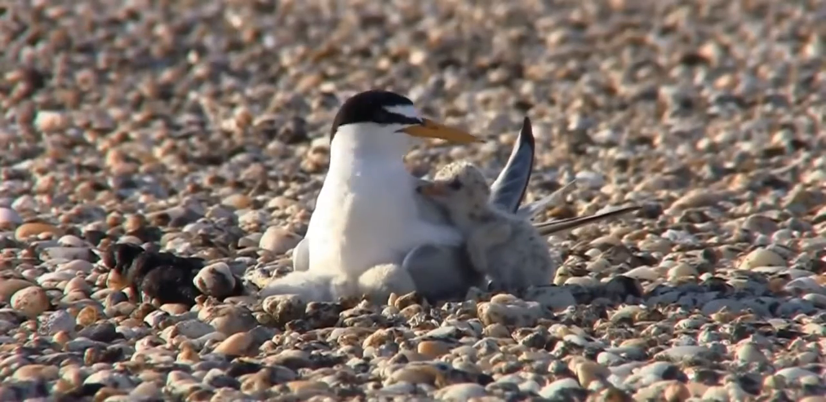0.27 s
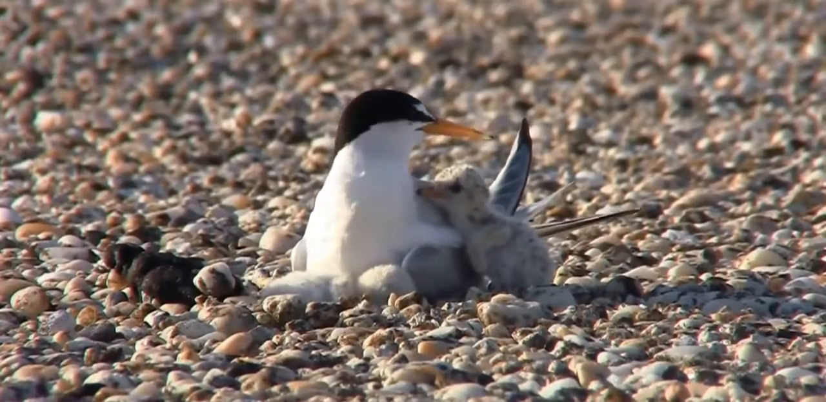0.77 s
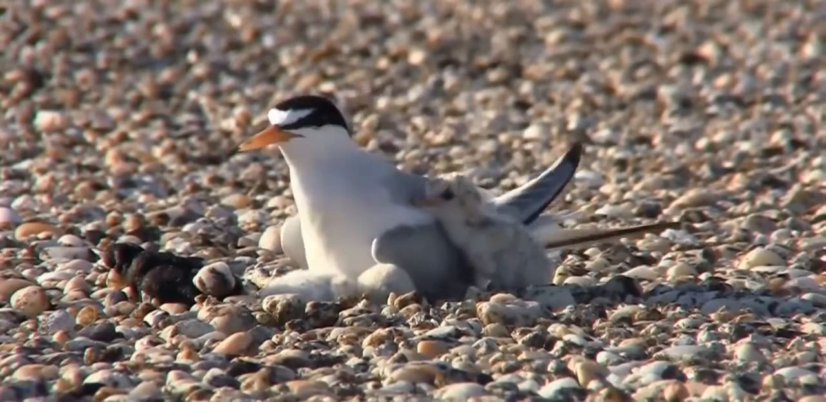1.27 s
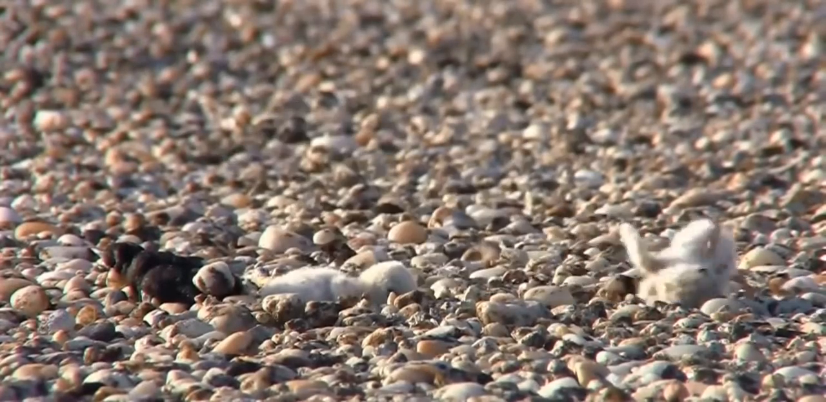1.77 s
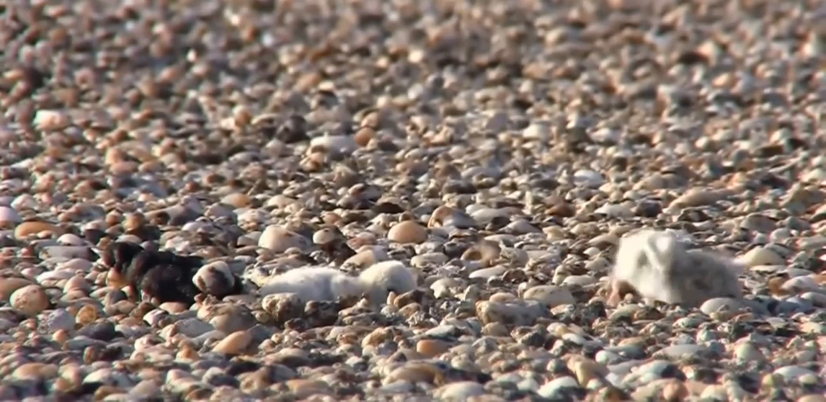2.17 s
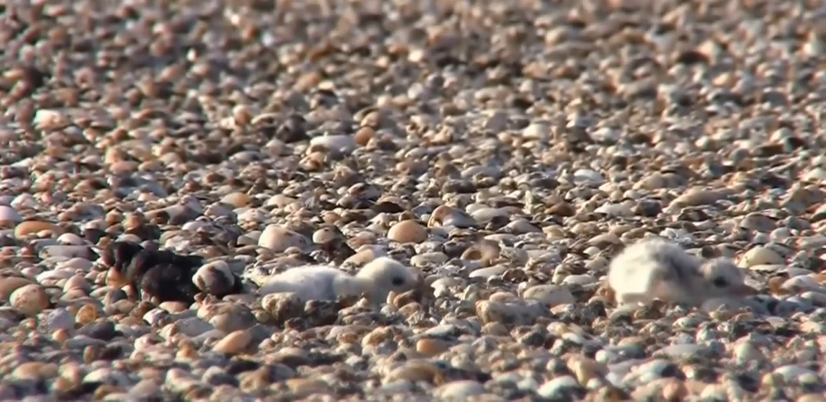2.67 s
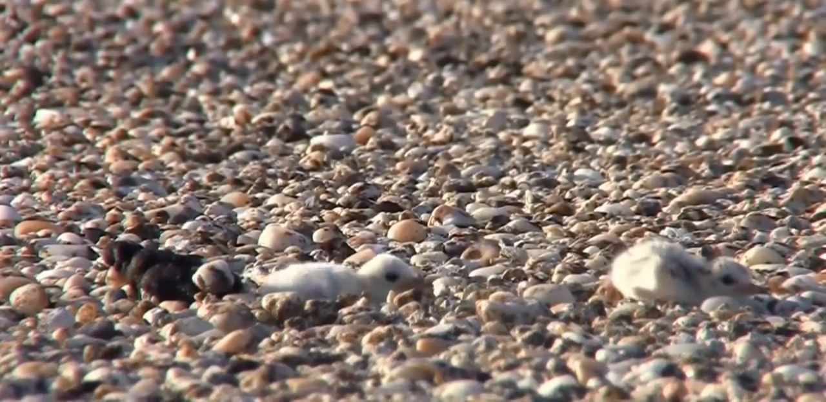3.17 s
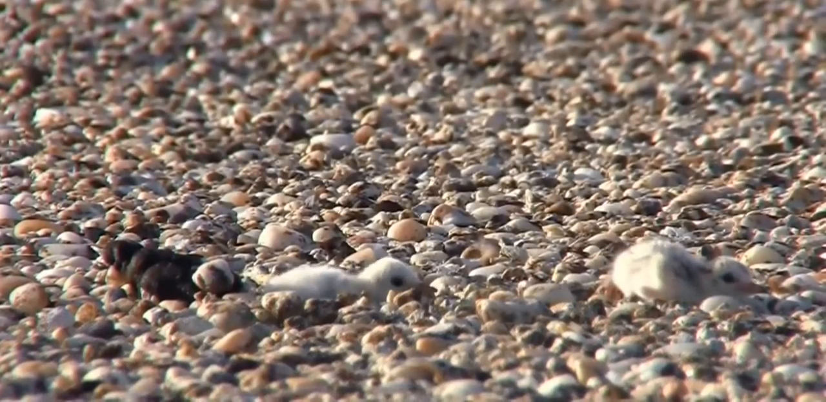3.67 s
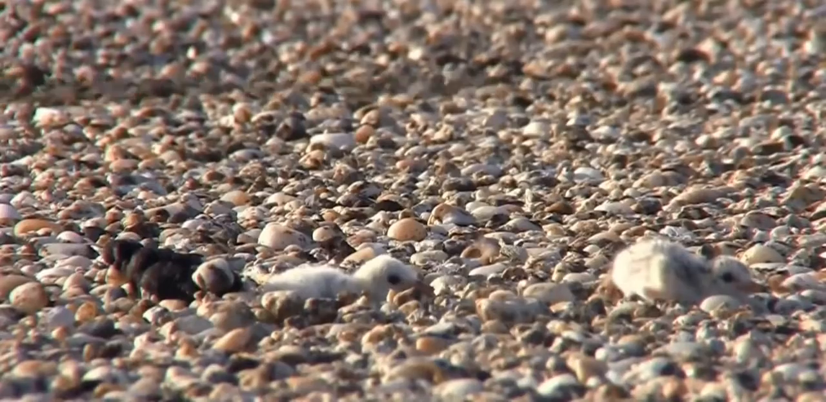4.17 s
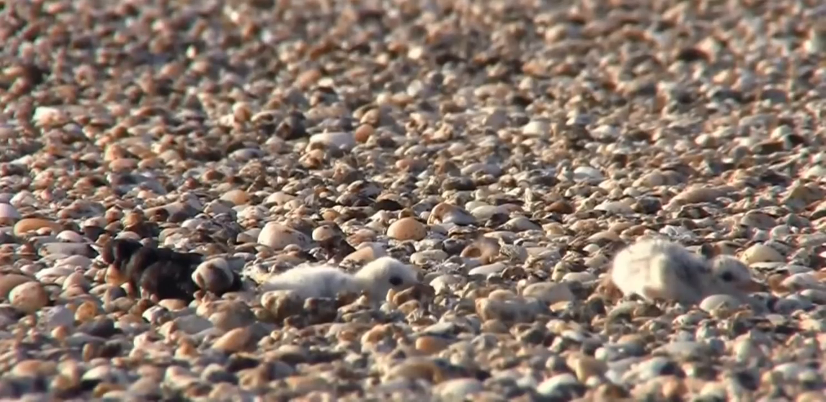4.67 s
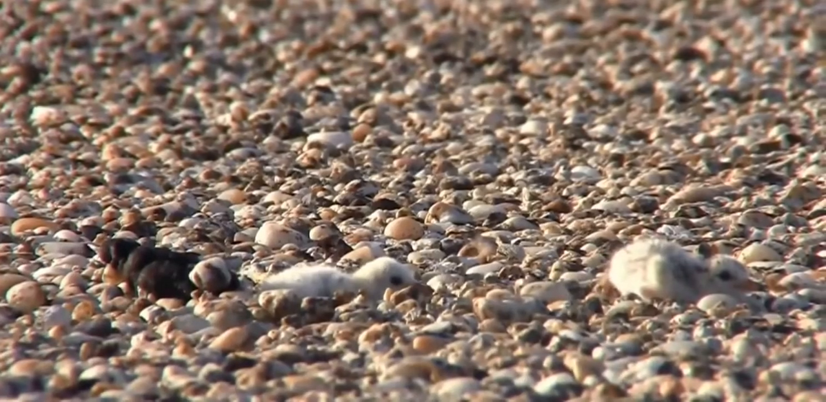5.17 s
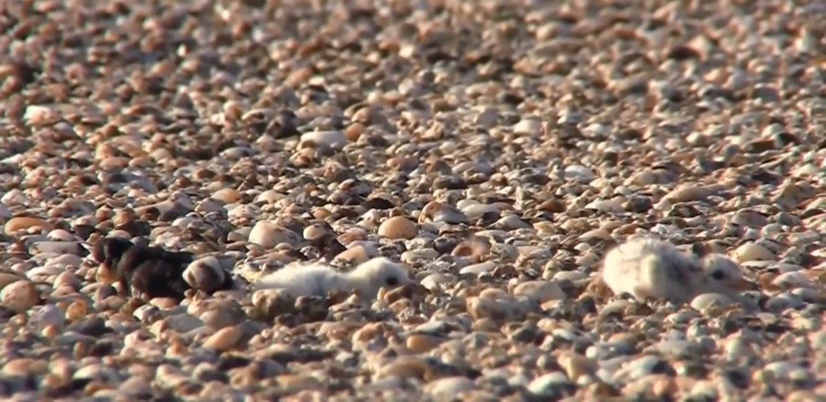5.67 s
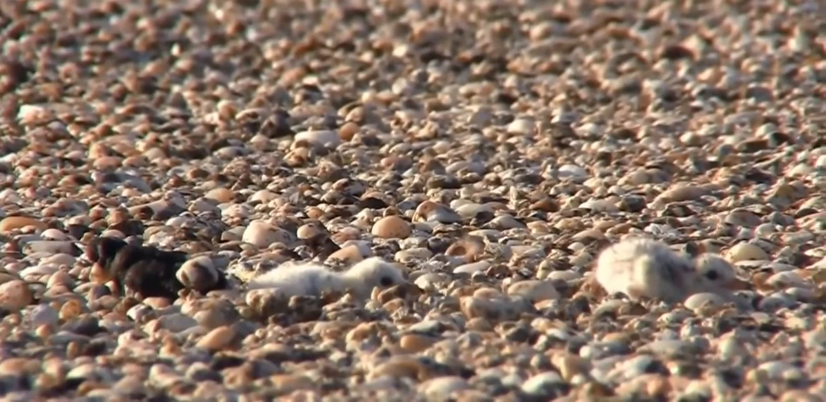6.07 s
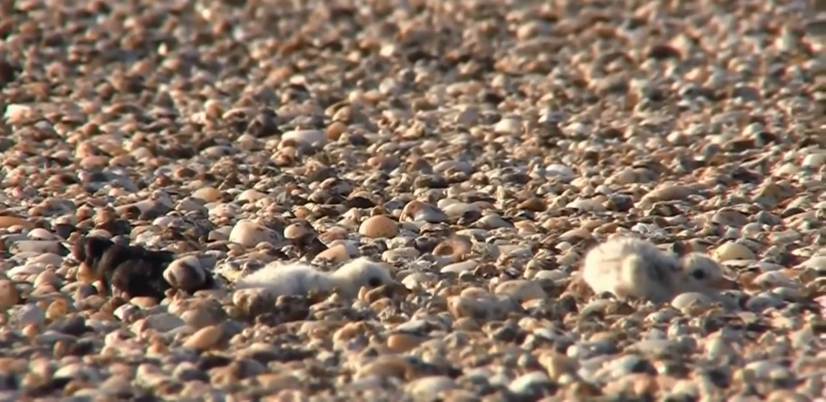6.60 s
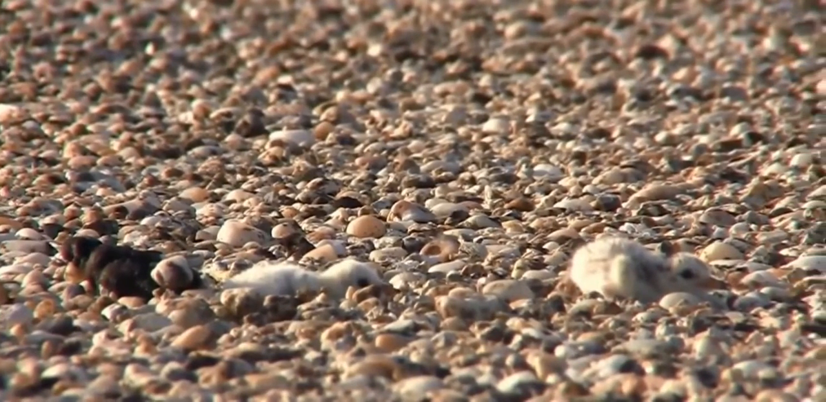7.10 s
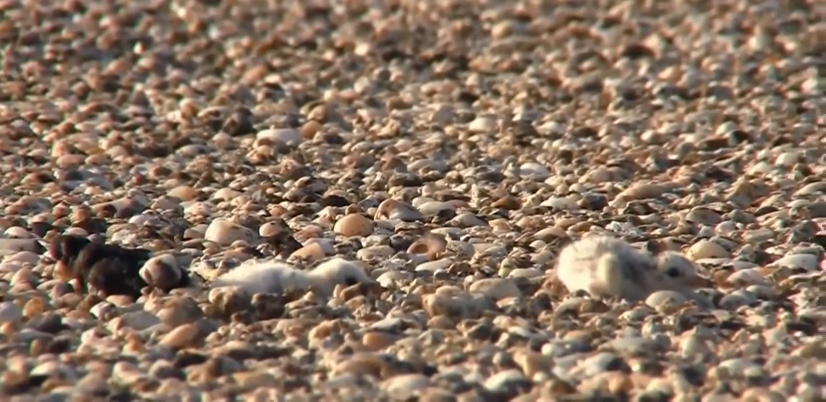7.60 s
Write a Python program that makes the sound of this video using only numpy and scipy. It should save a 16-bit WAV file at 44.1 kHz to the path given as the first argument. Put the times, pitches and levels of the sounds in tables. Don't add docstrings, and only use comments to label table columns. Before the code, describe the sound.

On an open shell beach, small seabirds chirp in quick squeaky, rattling clusters above a low steady rush, soft wind thumps and tiny mechanical clicks.

```python
import sys
import numpy as np
from scipy import signal
from scipy.io import wavfile
from scipy.ndimage import uniform_filter1d

SR = 44100
rng = np.random.default_rng(int(sys.argv[2]) if len(sys.argv) > 2 else 0)


def invert_db(x):
    u = np.asarray(x, float) / 20
    return 10 ** u


def store_pcm(level_fs):
    pcm = np.round(np.clip(level_fs, -1, 1) * 32767).astype(np.int16)
    wavfile.write(sys.argv[1], SR, np.atleast_2d(pcm).T)


N = 345744


def evened(x):
    return x / np.sqrt(np.mean(x ** 2) + 1e-20)


def read(points, hz):
    f, value = np.transpose(points)
    return np.interp(np.log(hz + 1), np.log(f + 1), value)


def add(mix, s, sound):
    part = mix[round(s * SR):][:len(sound)]
    part += sound[:len(part)]


def drift(size, span, *rows):
    curve = rng.standard_normal((*rows, size))
    curve = uniform_filter1d(uniform_filter1d(curve, span), span)
    return (curve - curve.mean(-1, keepdims=True)) / (curve.std(-1, keepdims=True) + 1e-12)


def noise(shape, size, patchy_db):
    hz = np.fft.rfftfreq(size, 1 / SR)
    frames = 4 * N // size + 5
    a, b, patches = rng.standard_normal((frames, len(hz), 3)).T
    patches = uniform_filter1d(patches, size=9, axis=0)
    patches = evened(uniform_filter1d(patches, size=12, axis=1))
    z = (a + 1j * b) * invert_db(read(shape, hz)[:, None] + patchy_db * patches)
    return evened(signal.istft(z, nperseg=size, noverlap=3 * size // 4)[1][:N])


# frequency in Hz, density in dB per Hz.
SURF_SPECTRUM = [(70, -46), (130, -6.5), (300, -11.5), (530, -14), (1020, -22), (1700, -35.5), (4000, -37),
                 (6700, -41), (8500, -49.5), (11000, -56.5), (15700, -64)]


def distant_surf():
    return invert_db(-24) * noise(SURF_SPECTRUM, size=1024, patchy_db=0.92)


# frequency in Hz, density in dB per Hz.
WIND_SPECTRUM = [(10, -43), (28, 9.5), (60, 8.5), (105, 13.5), (140, -0.5), (200, -24), (500, -101)]
# centre in seconds, half width in seconds, rise in dB.
GUSTS = [
    (.08, 0.17, 12),
    (.78, 0.15, 8.5),
    (1.33, 0.1, 9.5),
    (2.35, 0.082, 3),
    (4.0, 0.03, 4.5),
    (4.35, 0.11, 15),
    (4.95, 0.067, 7),
]


def wind():
    t = np.arange(N) / SR
    gust_db = sum(db * np.exp(-((t - s) / half) ** 2) for s, half, db in GUSTS)
    level_db = -28.5 + gust_db + 1.06 * drift(N, SR // 20)
    return invert_db(level_db) * noise(WIND_SPECTRUM, size=2048, patchy_db=2.5)


# frequency in Hz, width in Hz, level in dB, share of the load swing.
ENGINE_LINES = [(122.6, 2.4, -40.5, .3), (154, 3.3, -36, .3), (195.6, 1.63, -30, 1), (236.2, 3.4, -41, .3),
                (1052, 4, -45, .1)]
# time in seconds, level in dB.
ENGINE_LOAD = [(0, 1), (.25, -8), (.8, -6), (1.05, 2), (1.6, 0), (2.2, 3), (2.45, -2), (3.4, 0), (4.3, 1),
               (4.5, -4), (5.4, -3), (6.1, -6), (6.35, 1), (6.9, -2), (7.84, 3)]


def engine_hum():
    t = np.arange(N) / SR
    load_db = np.interp(t, *np.transpose(ENGINE_LOAD))
    out = np.zeros(N)
    for hz, width, db, share in ENGINE_LINES:
        span = int(SR / width / 3)
        wobble = 2.5 + drift(N, span) + 1j * drift(N, span)
        line = evened((wobble * np.exp(2j * np.pi * hz * t)).real)
        out += invert_db(db + share * load_db) * line
    return out


# first step in seconds, last step in seconds, level in dB.
LENS_RUNS = [(.549, .599, -45), (2.299, 2.299, -45), (2.422, 2.672, -42.5), (2.846, 2.946, -49),
             (3.017, 3.067, -48), (3.117, 3.268, -42), (3.664, 3.964, -48.5), (4.038, 4.088, -49),
             (4.138, 4.339, -42), (4.464, 4.664, -47), (4.785, 4.987, -41), (5.059, 5.41, -53),
             (5.485, 5.684, -47), (5.81, 6.107, -41), (6.181, 6.282, -50), (6.384, 6.534, -41),
             (6.612, 6.612, -41), (6.658, 6.957, -44), (6.985, 6.985, -45), (7.03, 7.081, -42.5),
             (7.16, 7.16, -44), (7.234, 7.333, -44), (7.606, 7.707, -44)]
# frequency in Hz, level in dB, 60 dB decay in seconds.
HOUSING = [(5470, -3, .09), (6140, -9, .06), (6900, -5, .06), (7265, 0, .1), (8250, -5, .055),
           (8965, -3, .07), (9580, -10, .06)]


def lens_drive():
    step_s = .05
    out, t = np.zeros(N), np.arange(3000) / SR
    snap_band = signal.butter(3, [4800, 9500], "band", fs=SR)
    for first, last, db in LENS_RUNS:
        for s in np.linspace(first, last, round((last - first) / step_s) + 1):
            strength, *spread = rng.standard_normal(len(HOUSING) + 1)
            ring = np.zeros(len(t))
            for (hz, ring_db, t60), r in zip(HOUSING, spread):
                ring += invert_db(ring_db + 2.5 * r - 60 * t / t60) * np.sin(2 * np.pi * hz * t)
            burst = rng.standard_normal(len(t)) * invert_db(-60 * t / .06)
            snap = invert_db(8) * signal.lfilter(*snap_band, burst)
            onset = np.minimum(t / .001, 1)
            add(out, s, invert_db(db - 1 + 2 * strength) * (ring + snap) * onset)
    return out


# start in seconds, length in seconds, level in dB.
FAR_CHATTER = [
    (3.597, 0.19, -34),
    (4.298, 0.1, -30),
    (4.819, 0.06, -25),
    (5.454, 0.099, -32.5),
    (6.778, 0.022, -30),
    (6.86, 0.084, -36),
    (7.318, 0.12, -37),
]


def far_chatter():
    out = np.zeros(N)
    for s, length, db in FAR_CHATTER:
        size = round(length * SR)
        wobble = drift(size, span=SR // 500) + 1j * drift(size, span=SR // 500)
        band = (wobble * np.exp(2j * np.pi * 3650 * np.arange(size) / SR)).real
        fade_db = -9.9 * np.linspace(0, 1, size)
        add(out, s, invert_db(db + fade_db) * band * signal.windows.tukey(size, .2))
    return out


def beach_echo(x, t60=.3):
    taps = np.zeros(SR // 2)
    at = np.arange(300, len(taps) - 40, 40)
    taps[at + rng.integers(0, 40, len(at))] = rng.choice([-1., 1.], len(at))
    decay = invert_db(-60 * np.arange(len(taps)) / SR / t60)
    taps = signal.lfilter(*signal.butter(2, 5200, fs=SR), taps * decay)
    return signal.fftconvolve(x, taps / np.linalg.norm(taps))[:N]


def syrinx(pitch_hz, colour_db, rough):
    size = len(pitch_hz)
    turns = 2 * np.pi * np.cumsum(pitch_hz * (1 + rough * drift(size, span=SR // 800))) / SR
    k = np.arange(1, 15)[:, None]
    hz = k * pitch_hz
    high = np.clip(hz / 4000 - 1, .05, 1)
    flutter_db = 3.2 * high * (drift(size, SR // 300, len(k)) + rng.standard_normal(k.shape))
    gains = invert_db(colour_db(k, hz) + flutter_db) * (hz < .45 * SR)
    phase = 2 * np.pi * rng.random(k.shape)
    return evened((gains * np.sin(k * turns + phase)).sum(0))


def rattles(strokes, throat, part, odd_db=-13, flat=1.1):
    foot = .298
    out, breath_band = np.zeros(N), signal.butter(2, [2200, 6000], "band", fs=SR)
    for s, length, top_hz, db in strokes:
        size = round(length * SR)
        arch = abs(np.sin(np.pi * np.linspace(*part, size)))
        own_db = 2.5 * rng.standard_normal((14, 1))

        def colour_db(k, hz):
            return read(throat, hz) + odd_db * arch ** 2 * (k % 2) + own_db

        voice = syrinx(top_hz * (foot + (1 - foot) * arch ** flat), colour_db, rough=.005)
        breath = signal.lfilter(*breath_band, rng.standard_normal(size))
        breath = evened(breath * invert_db(3 * drift(size, span=SR // 500)))
        stutter_db = 1.5 * drift(size, span=SR // 500)
        swell = arch ** 1.7 * signal.windows.tukey(size, .25)
        add(out, s, invert_db(db + stutter_db) * (voice + .13 * breath) * swell)
    return out


# frequency in Hz, level in dB.
BRIGHT_THROAT = [(1200, -8.5), (2100, -1), (3000, 3), (4100, 6), (5000, 2.5), (6000, -8), (8000, -21),
                 (13000, -63)]
DARK_THROAT = [(1200, -3.5), (2000, -4), (2800, -2), (3600, 11), (4500, 7), (6000, -9.5), (8000, -31),
               (13000, -50)]
# start in seconds, length in seconds, pitch at the top of the arch in Hz, level in dB.
ARCHES = [(2.526, .032, 1050, -20), (6.352, .04, 1250, -27), (5.135, 0.053, 1248, -21.5),
          (5.332, 0.042, 1070, -24), (4.65, .04, 1000, -26), (5.68, .03, 1450, -23),
          (4.235, .03, 1320, -29), (6.942, .044, 1060, -22), (7.05, 0.032, 1050, -35),
          (7.785, .022, 1497, -16)]
CLIMBS = [(7.826, 0.0136, 1000, -25), (3.17, .016, 1130, -21), (6.748, 0.017, 1450, -21),
          (4.668, .016, 1200, -24), (2.768, .019, 1050, -18.5), (4.626, .019, 1100, -16),
          (4.713, .018, 1200, -13), (2.518, .02, 1180, -16), (5.61, .016, 1150, -16),
          (2.573, 0.017, 1400, -17), (4.767, 0.017, 1250, -14), (5.675, 0.017, 1250, -16.5),
          (5.722, 0.015, 960, -17), (6.42, 0.017, 768, -18), (6.478, 0.022, 810, -14.5)]
DROPS = [(2.796, 0.011, 1010, -26), (4.644, 0.017, 702, -16), (2.612, 0.013, 1156, -21.5),
         (2.866, 0.024, 1400, -22), (3.251, 0.015, 1100, -23), (2.558, .012, 1000, -21),
         (4.695, 0.0092, 930, -17), (4.806, 0.016, 988, -15), (5.697, 0.022, 990, -17),
         (5.79, .016, 1033, -18), (5.806, .024, 1150, -21), (5.632, .022, 1050, -20),
         (5.457, .025, 1350, -29), (6.453, 0.015, 970, -22), (6.54, 0.025, 804, -19.5),
         (6.56, 0.024, 1085, -21)]


def colony_rattles():
    arches = rattles(ARCHES, BRIGHT_THROAT, (0, 1), odd_db=-7, flat=.6)
    climbs = rattles(CLIMBS, BRIGHT_THROAT, (.06, .44))
    return arches + climbs + rattles(DROPS, DARK_THROAT, (.6, .88))


def glide(length, start_hz, middle_hz, end_hz):
    u = np.linspace(0, 1, round(length * SR))
    curve = np.polyfit([0, .5, 1], [start_hz, middle_hz, end_hz], 2)
    return np.maximum(np.polyval(curve, u), 400)


def whistles(notes, partials_db, bow=.025, waver_db=1.2):
    out, edge = np.zeros(N), .003
    partials = np.r_[partials_db, np.full(6, -70)][:, None]
    for s, length, hz, slide_hz, db in notes:
        ends = hz * (1 - bow)
        membrane_hz = glide(length + edge, ends - slide_hz / 2, hz, ends + slide_hz / 2) / 2
        t = np.arange(len(membrane_hz)) / SR
        u = t / t[-1]

        def colour_db(k, f):
            return partials + 3 * (k == 4) * (f < 6000) - 6 * (k > 3) * u

        voice = syrinx(membrane_hz, colour_db, rough=.003 + .002 * waver_db)
        breath = np.minimum(t / .003, 1) * np.minimum((t[-1] - t) / .005, 1)
        breath = breath * invert_db(-4 * (u - .5) + waver_db * drift(len(t), span=SR // 400))
        add(out, s - edge / 2, invert_db(db) * voice * breath)
    return out


def unslid(rows):
    return [(s, length, hz, 0, db) for s, length, hz, db in rows]


PURE_DB = [-61, 15.5, -22, -15, -45, -28, -50, -36]
# start in seconds, length in seconds, middle pitch in Hz, slide in Hz, level in dB.
SOFT_WHISTLES = [(2.598, .016, 3410, 350, -23), (2.651, 0.0096, 3770, -80, -33),
                 (2.686, .016, 3320, 80, -34), (3.186, 0.01, 3660, -100, -22.5),
                 (3.748, 0.039, 3510, -100, -36), (4.419, 0.008, 3430, -410, -25.5),
                 (4.46, .014, 3450, 110, -26), (4.475, 0.013, 3350, -400, -15),
                 (3.504, .013, 3510, 150, -18.5), (4.855, 0.022, 3750, 110, -28),
                 (4.882, 0.017, 3760, 110, -24.5), (4.912, .015, 3504, -660, -25.5),
                 (5.066, 0.015, 3520, -22, -36.5), (5.116, .011, 3440, 50, -23.5),
                 (5.362, 0.013, 3630, -140, -23.5), (5.67, 0.012, 3630, 100, -18.5),
                 (5.692, 0.0081, 3890, -130, -13), (6.631, 0.022, 3500, -300, -29.5),
                 (6.685, .026, 3620, -190, -27), (6.739, .036, 3560, -340, -24),
                 (7.01, .009, 3680, -200, -19.5), (7.11, 0.046, 3500, -250, -30),
                 (7.292, .04, 3500, -450, -29.5), (7.298, 0.017, 3710, -38, -25)]


def further_whistles():
    return whistles(SOFT_WHISTLES, PURE_DB, waver_db=3.5)


# start in seconds, length in seconds, middle pitch in Hz, slide in Hz, level in dB.
PURE_WHISTLES = [(2.204, .014, 3340, -450, -30), (2.538, .021, 3720, -480, -10),
                 (2.572, .024, 3260, 102, -12), (2.823, 0.026, 3390, -420, -14),
                 (3.227, 0.024, 3720, 260, -14), (3.461, 0.017, 3500, -700, -18),
                 (3.563, 0.028, 3730, -380, -20), (4.242, 0.0092, 3580, -200, -18),
                 (4.289, 0.014, 3590, -120, -16.5), (4.516, 0.018, 3430, 100, -14),
                 (4.59, 0.049, 3674, -400, -18.5), (4.685, 0.0093, 3590, -200, -13.5),
                 (4.731, 0.018, 3730, -600, -7), (4.795, 0.012, 3630, 102, -9.5),
                 (4.961, 0.027, 3460, -120, -20), (5.411, .046, 3430, -300, -20),
                 (5.625, 0.0075, 3820, -370, -13.5), (5.741, .041, 3780, -400, -10),
                 (6.404, 0.015, 3790, 70, -17.5), (6.496, .045, 3690, -280, -15.5),
                 (6.59, 0.037, 3270, -300, -25), (7.55, 0.016, 3624, 122, -16.5),
                 (7.747, 0.017, 3570, -360, -19), (7.805, 0.036, 3660, -370, -19.5)]
SPLIT_WHISTLES = [(2.851, 0.015, 3800, -140, -19.5), (4.558, 0.021, 4050, -450, -24.5),
                  (5.405, .011, 4500, 50, -23), (5.859, 0.013, 4300, -300, -20.5),
                  (5.903, 0.014, 4280, 200, -18.5), (6.36, 0.013, 4270, 150, -23),
                  (6.438, 0.012, 3850, -200, -12), (6.543, 0.014, 3840, -600, -19.5),
                  (6.577, .011, 4300, -100, -26.5), (7.505, .009, 4250, 50, -20.5),
                  (3.598, .022, 3830, -250, -25.5), (3.512, .014, 3900, -100, -22),
                  (6.836, .015, 3700, -100, -25), (2.185, .02, 3950, 300, -31),
                  (7.234, .03, 3820, -400, -27.5)]
LOW_WHISTLES = [(7.515, 0.01, 2450, -500, -30), (3.186, .012, 2760, -300, -27.5),
                (2.786, 0.008, 2710, -320, -25.5), (3.275, 0.017, 2715, -170, -24),
                (3.328, 0.019, 2470, -170, -28), (3.913, 0.018, 2740, -160, -25.5),
                (3.973, .01, 2500, -280, -27), (4.607, 0.021, 2620, -83, -30),
                (4.662, 0.03, 2650, -150, -27.5), (4.783, .012, 2530, 80, -23),
                (5.745, .021, 2600, -400, -30), (5.782, 0.01, 2620, -150, -23),
                (6.369, 0.011, 2460, -450, -29), (6.812, 0.024, 2560, -500, -28),
                (2.588, .013, 2740, 60, -29), (3.757, .013, 2600, 50, -40)]
OPEN_WHISTLES = [
    (2.109, .022, 3510, -450, -21),
    (2.159, 0.0227, 3710, -48, -17.5),
]
# start in seconds, length in seconds, top pitch in Hz, level in dB.
ARCHED_WHISTLES = [
    (1.829, 0.022, 4050, -38),
    (1.88, 0.016, 3930, -37),
    (3.06, .02, 3450, -38),
    (3.735, .014, 4250, -36),
]
ARCHED_SPLIT = [
    (2.246, .032, 3970, -30),
    (4.537, 0.014, 3930, -20),
]
SPLIT_DB = [-15.5, 1, -17.5, -28, -45, -38, -50, -46]
LOW_DB = [-40, 1, -30, -14, -40, -25.5, -50, -45]
OPEN_DB = [-40, -0.5, -26, -11.5, -34, -35, -29, -35]


def near_whistles():
    out = whistles(PURE_WHISTLES, PURE_DB)
    out += whistles(SPLIT_WHISTLES, SPLIT_DB, waver_db=2.8)
    out += whistles(unslid(ARCHED_WHISTLES), PURE_DB, bow=.07)
    out += whistles(unslid(ARCHED_SPLIT), SPLIT_DB, bow=.07, waver_db=3.5)
    out += whistles(LOW_WHISTLES, LOW_DB)
    return out + whistles(OPEN_WHISTLES, OPEN_DB, bow=.075)


def whistle_skirts():
    join_s = .005
    lead_s, release_s = .013, .015
    notes = PURE_WHISTLES + SOFT_WHISTLES + LOW_WHISTLES + OPEN_WHISTLES + SPLIT_WHISTLES
    notes = notes + unslid(ARCHED_WHISTLES) + unslid(ARCHED_SPLIT)
    starts = np.array([note[0] for note in notes])
    ends = starts + np.array([note[1] for note in notes])
    lead, release = [], []
    for start, end, (_, _, hz, _, db) in zip(starts, ends, notes):
        tune_in, tune_out = 1 + .04 * rng.standard_normal(2)
        db = db + 6 * (hz < 3000)
        if abs(ends - start).min() > join_s:
            lead.append((start - lead_s + 0.000947, lead_s, 1120 * tune_in, db - 4.5))
        if abs(starts - end).min() > join_s:
            release.append((end - .001, release_s, 1076 * tune_out, db - 8))
    return rattles(lead, BRIGHT_THROAT, (.07, .44)) + rattles(release, DARK_THROAT, (.62, .9))


# start in seconds, length in seconds, pitch at the top of the arch in Hz, level in dB.
CHIPS = [
    (0.288, 0.044, 1202, -10.5),
    (0.69, 0.046, 1172, -12.5),
]
# frequency in Hz, level in dB.
CHIP_THROAT = [(1200, -43), (2400, -8.5), (3600, 4), (4800, 3), (6000, -2.5), (7200, -21), (9000, -24),
               (11000, -51), (14000, -33), (16000, -33)]


def close_chips():
    out = np.zeros(N)
    for s, length, top_hz, db in CHIPS:
        rise = np.sin(np.pi * np.linspace(0, 1, round(length * SR)))
        rise = np.maximum(rise, 0)
        pitch_hz = top_hz * (.42 + 0.577 * rise ** 0.86)
        voice = syrinx(pitch_hz, lambda k, hz: read(CHIP_THROAT, hz), rough=.012)
        add(out, s, invert_db(db) * voice * rise ** 1.66)
    return out


def scene():
    background = distant_surf() + wind() + engine_hum() + lens_drive() + far_chatter()
    far = further_whistles()
    locked = near_whistles() + far
    rattled = whistle_skirts() + colony_rattles()
    close = close_chips()
    echo = invert_db(-21.5) * beach_echo(.55 * locked + 1.6 * far + .9 * rattled + .6 * close)
    return (background + locked + rattled + close + echo)[None]


def band_limit(x):
    return signal.sosfilt(signal.butter(12, 15720, fs=SR, output="sos"), x)


def record(dry):
    limited = signal.oaconvolve(dry, signal.firwin(255, 15500, fs=SR)[None], "same")
    return band_limit(limited)


dry = scene()
out = record(dry)
store_pcm(out)
```